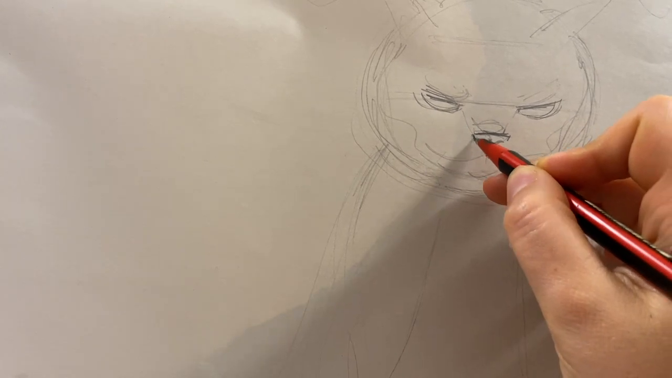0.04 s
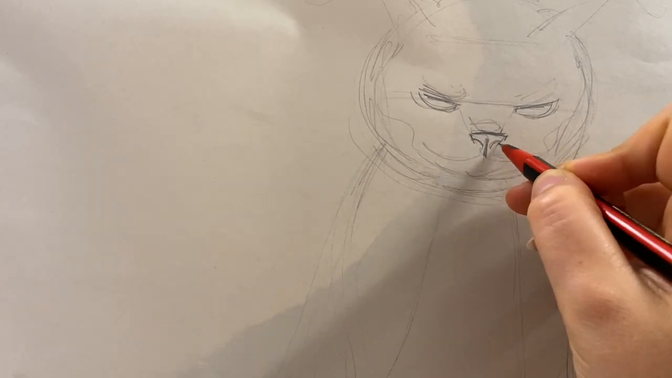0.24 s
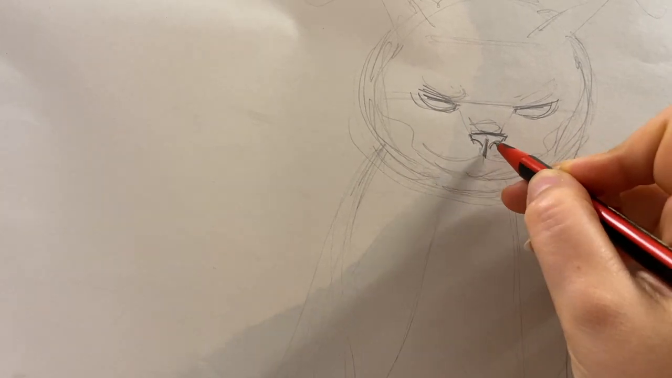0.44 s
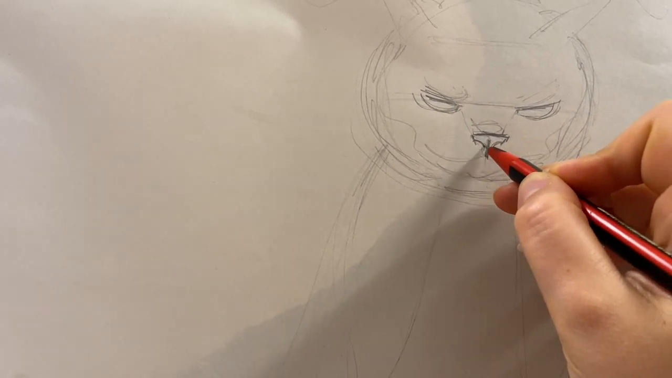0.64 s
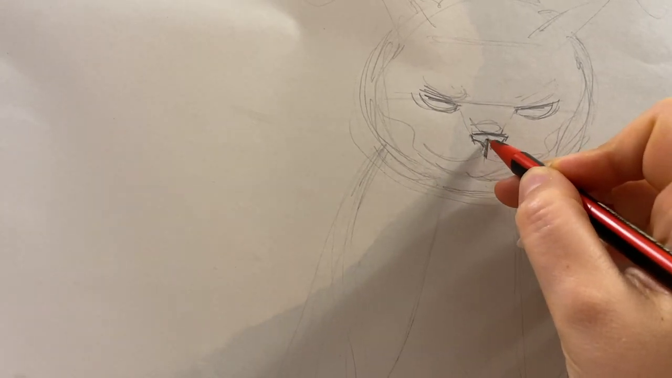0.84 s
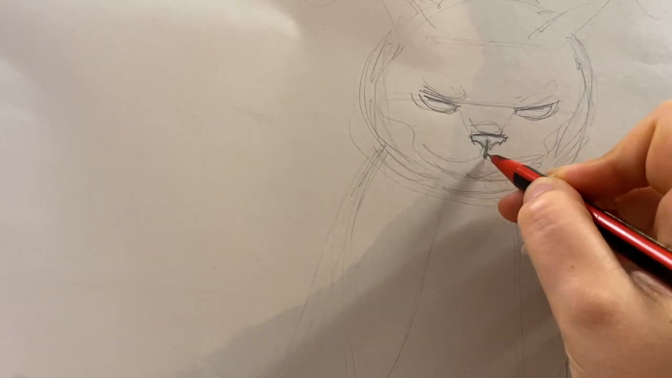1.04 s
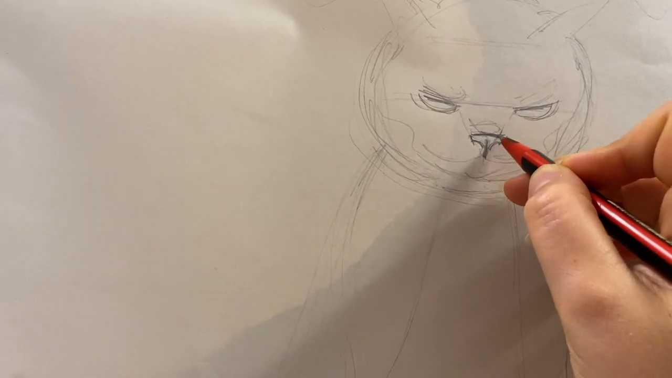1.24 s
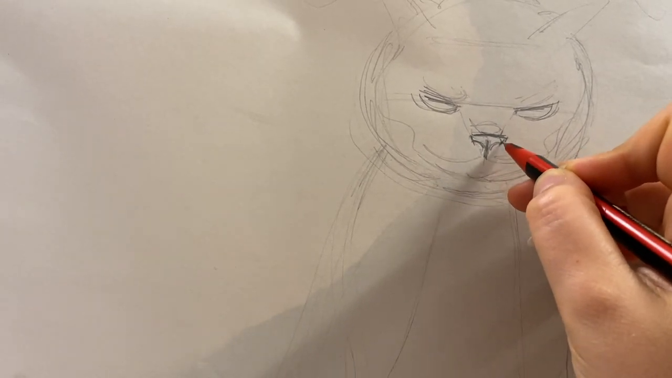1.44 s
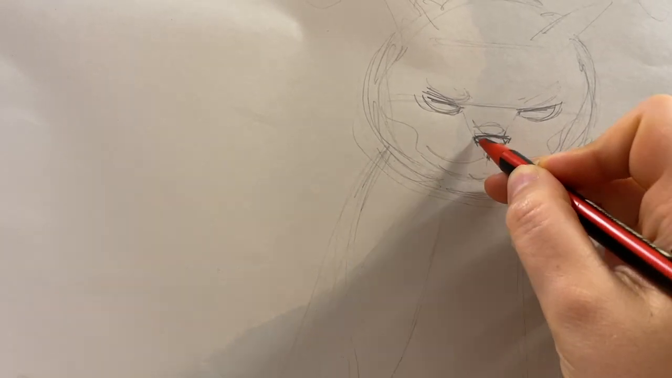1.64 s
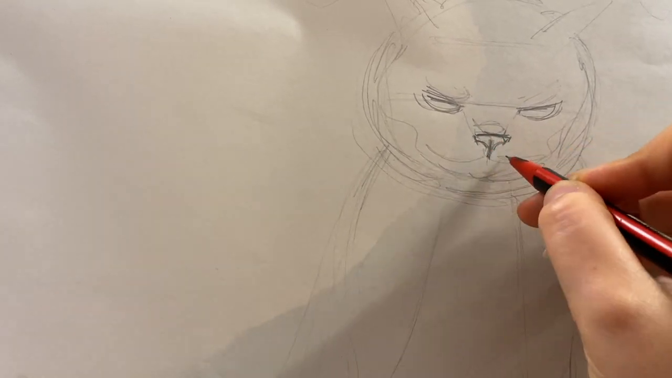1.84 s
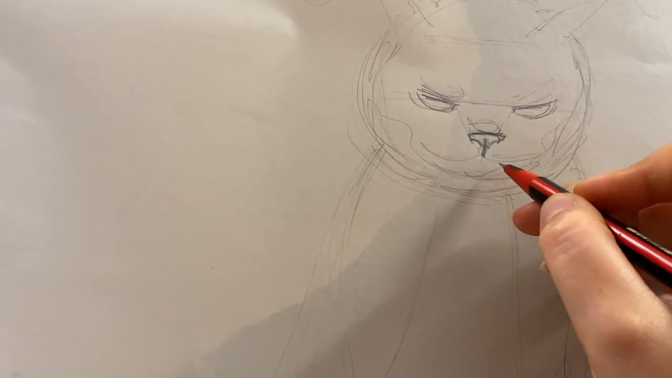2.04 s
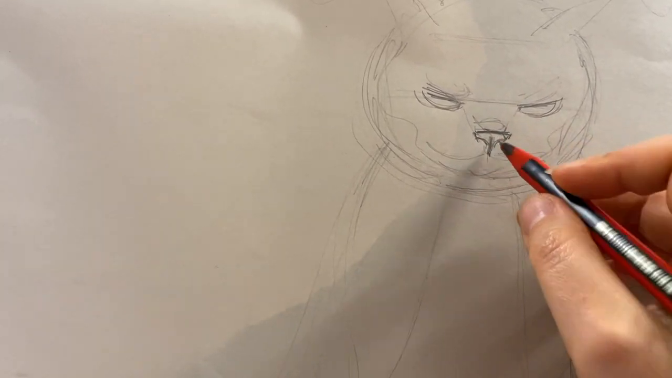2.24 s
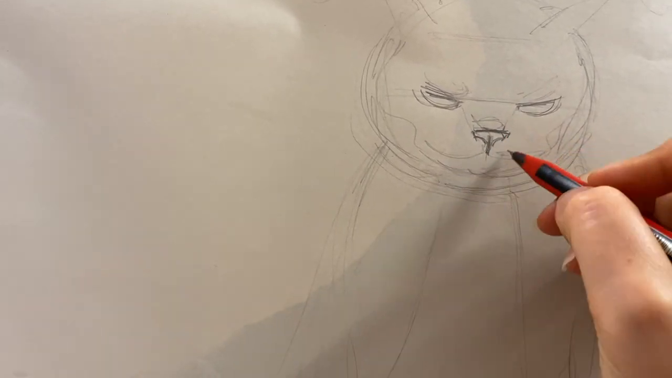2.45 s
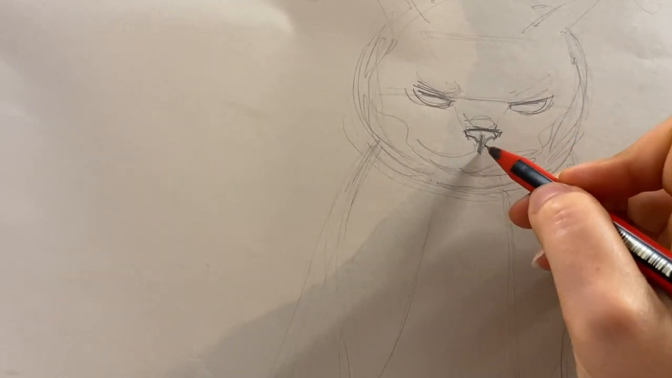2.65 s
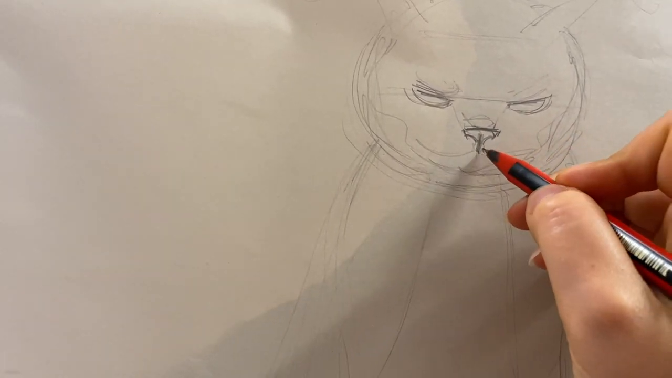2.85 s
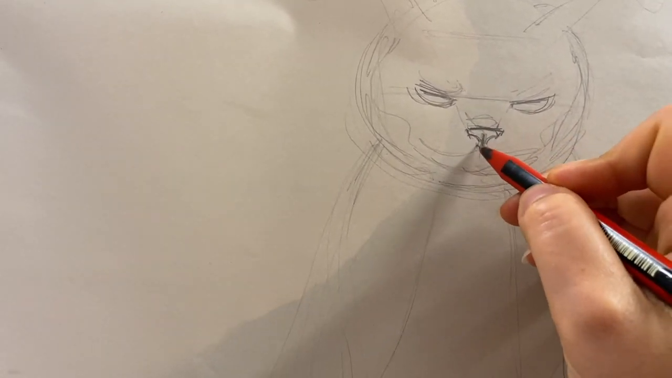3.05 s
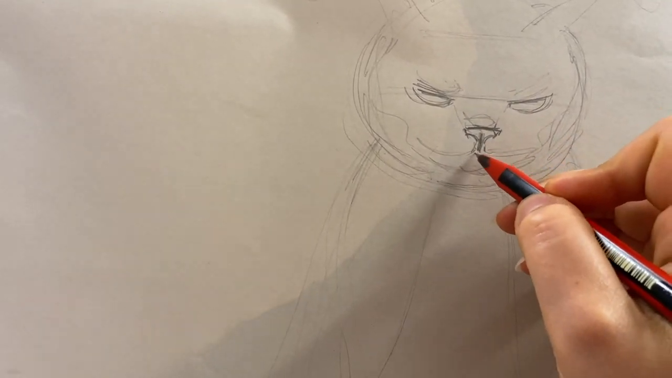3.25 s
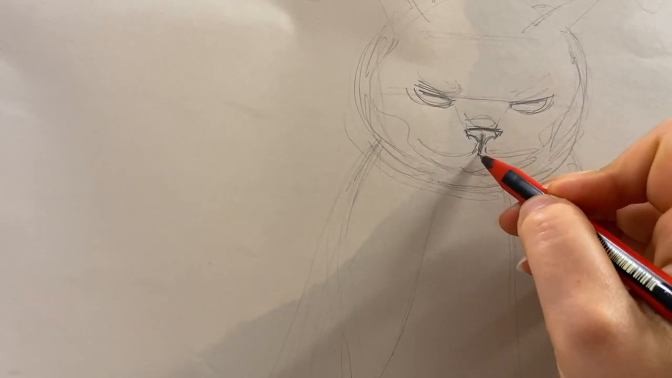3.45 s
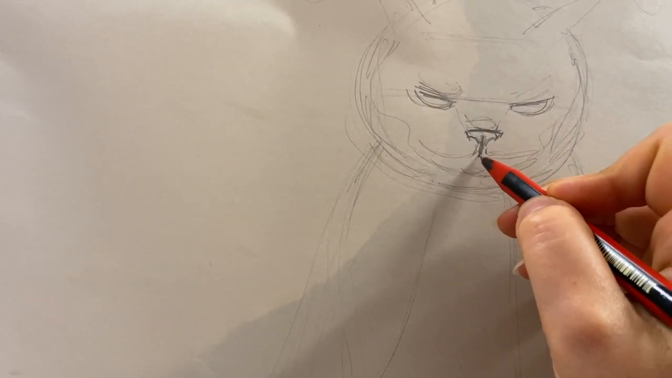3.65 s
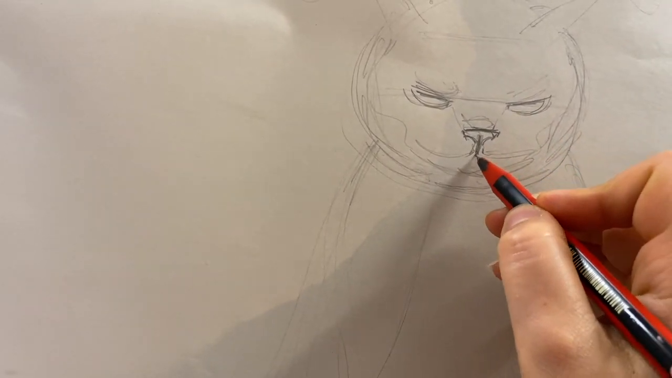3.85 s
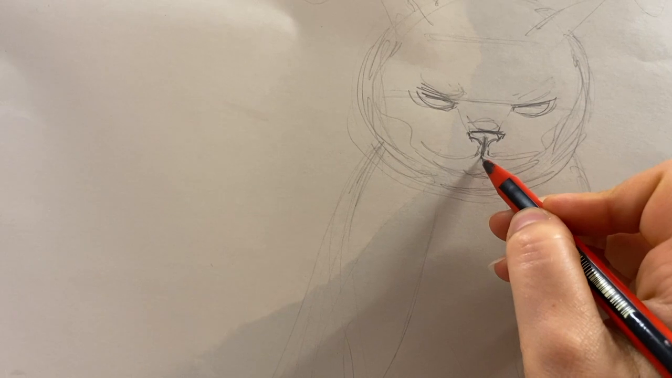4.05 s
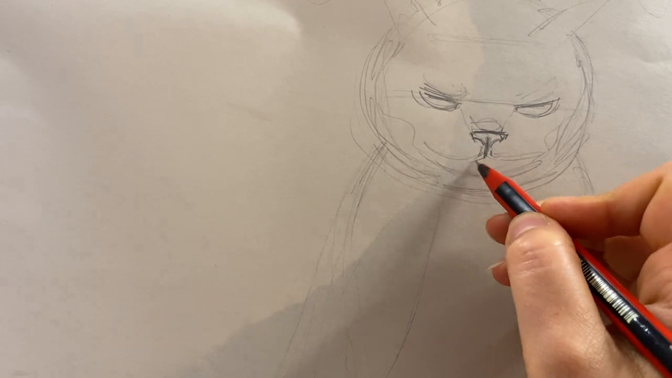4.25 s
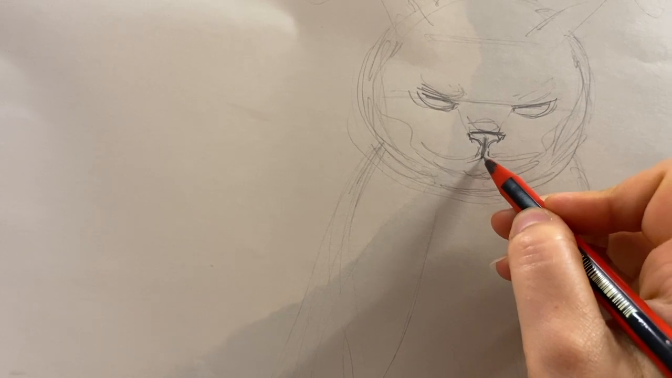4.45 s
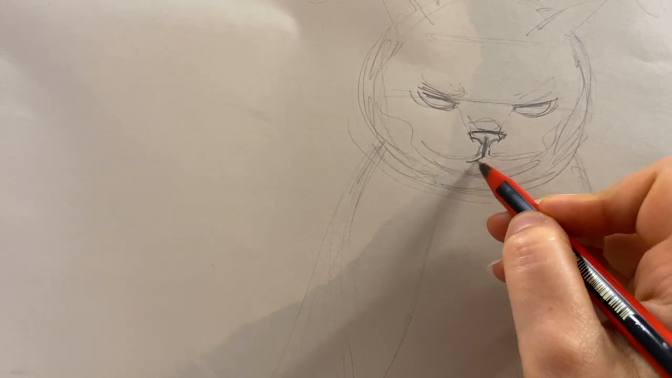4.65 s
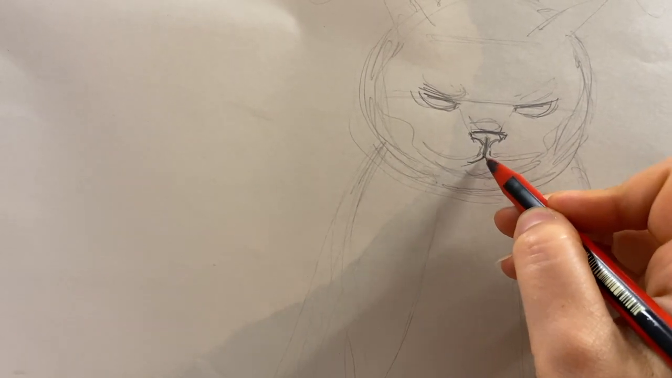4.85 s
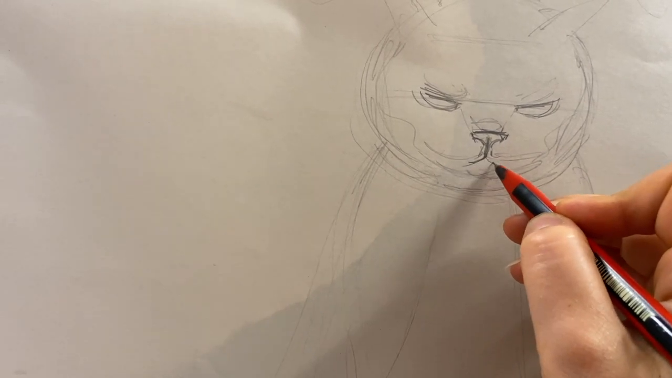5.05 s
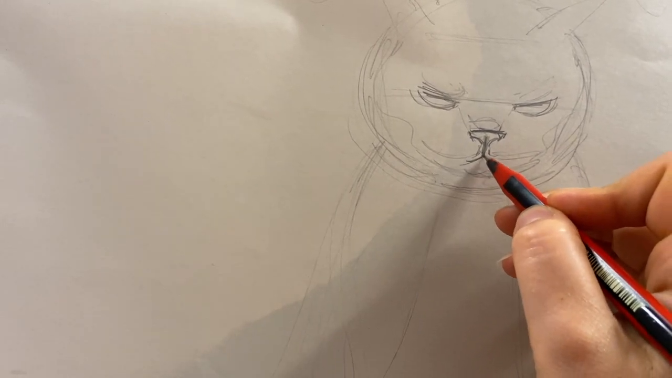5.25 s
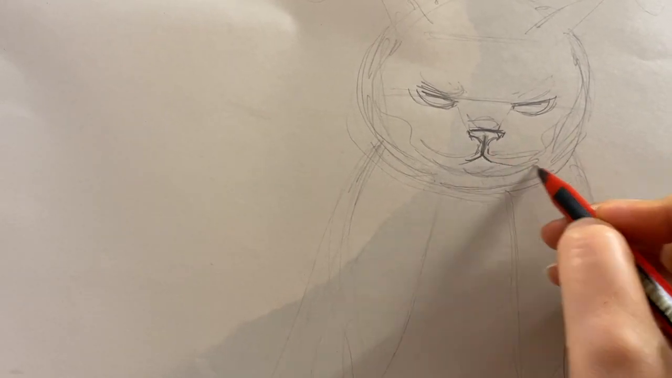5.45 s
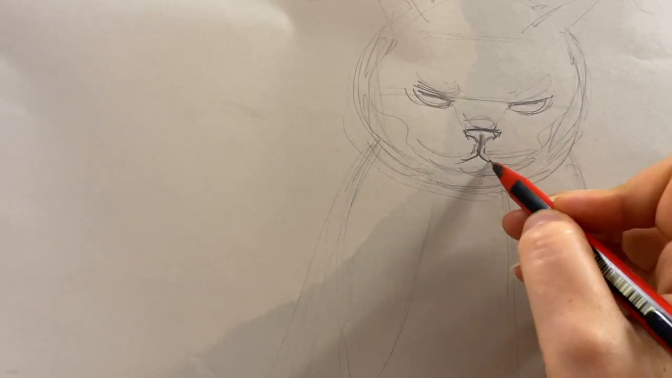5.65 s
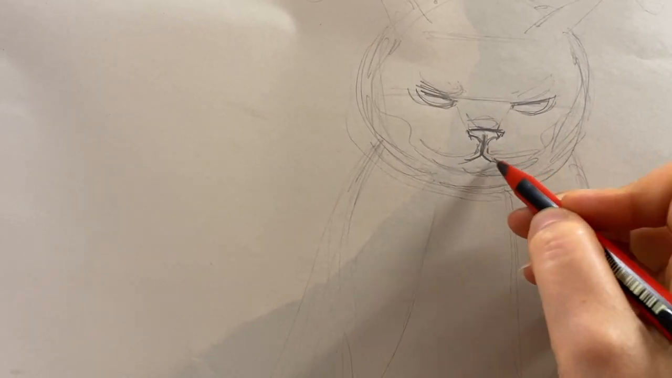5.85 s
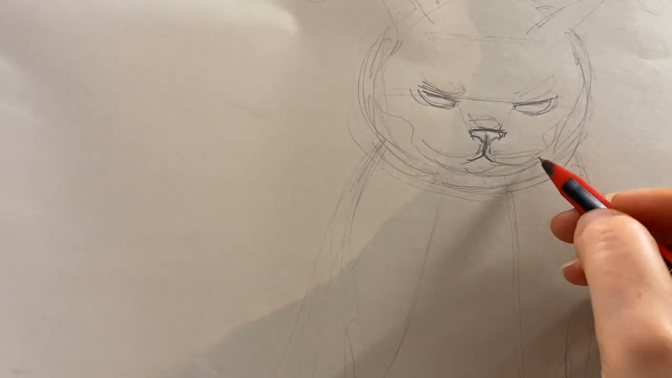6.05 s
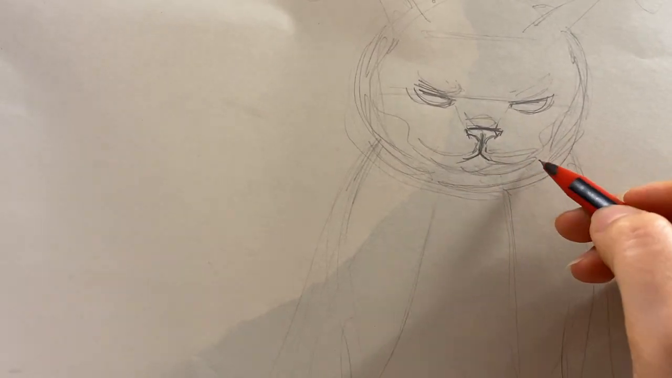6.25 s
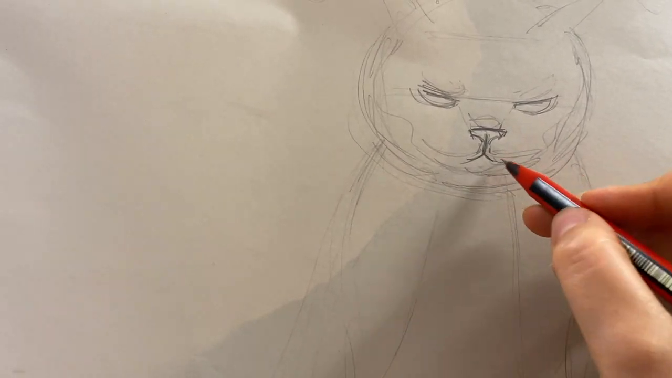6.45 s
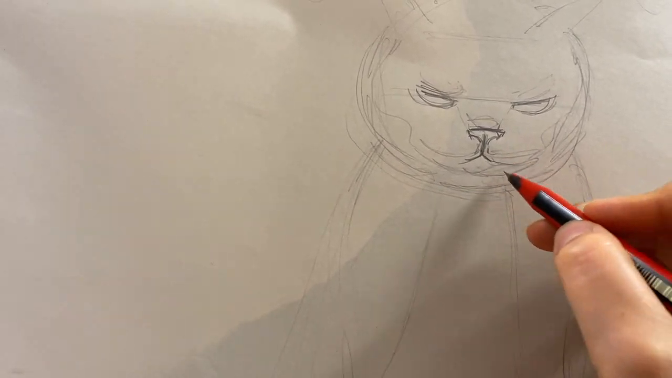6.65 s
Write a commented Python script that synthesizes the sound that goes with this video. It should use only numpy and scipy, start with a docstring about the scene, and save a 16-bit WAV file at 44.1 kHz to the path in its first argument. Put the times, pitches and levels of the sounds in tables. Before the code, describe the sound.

Close stereo pickup of a pencil sketching on paper in a small, quiet, dry room. Quick short scratches come in clusters, each a dry hiss and rasp with a low hollow thrum of the sheet. Soft taps mark the lead or hand landing. Activity thins after about a second and a half, pauses, then returns in tight bursts and firmer single strokes, ending with faint skin brushes.

```python
"""Pencil sketching on paper

Short pencil strokes heard close by in a quiet room. The lead hisses over the fibres and rasps on
the paper's tooth as uneven noise rung through resonances, and sets the sheet thrumming.
Soft blows land as falling chirps, and skin brushes and scuffs in swells of fine friction.
Beneath lie a low room tone of shaped noise, a faint diffuse tail and one brief steady tone."""
import sys
import numpy as np
from scipy import signal
from scipy.fft import rfft, irfft
from scipy.io import wavfile
from scipy.ndimage import uniform_filter1d

SR = 44100
rng = np.random.default_rng(int(sys.argv[2]) if len(sys.argv) > 2 else 0)


def transcribe(u):
    """Save the signal u as a 16-bit wav file named by the first command-line argument.

    u: samples, shape (n,) or (channels, n), limited to [-1, 1]; the rate is SR.
    q: integer samples, one column per channel.
    """
    v = np.clip(np.atleast_2d(u).T, -1, 1)
    q = np.round(v * 32767).astype(np.int16)
    wavfile.write(sys.argv[1], SR, q)


N = 295911
BLOCK = 10240  # samples in one short sound
HZ = np.fft.rfftfreq(BLOCK, 1 / SR)
TIME = np.arange(BLOCK) / SR

# Colour of the room tone. Each row: frequency in Hz, relative density in dB per Hz.
ROOM_TONE_COLOUR = [(15, -74), (25, -35.5), (107, 3), (144, -1), (178, -5), (260, -9.5), (331, -11.5),
                    (389, -13.5), (421, -15), (552, -16.5), (614, -18), (741, -19.5), (919, -21.5),
                    (2850, -31.5), (15500, -40)]
# Likeness of left and right in the room tone. Each row: frequency in Hz, likeness from 0 to 1.
ROOM_LIKENESS = [(60, 0.95), (180, 0.93), (550, 0.57), (1650, 0.05), (4970, 0.18), (15000, 0.6)]
# Reverberation of the room. Each row: frequency in Hz, time to die by 60 dB in seconds.
ROOM_DECAY = [(150, 0.13), (600, 0.05), (3000, 0.17), (14000, 0.092)]
# The brief tone. One row: start in seconds, end in seconds.
HUM_START_END = (4.29, 4.40)

# The hand slides on the page. Each row: start in seconds, length in seconds, level in dB at its fullest.
HAND_BRUSHES = [(0.739, 0.075, -72), (2.188, 0.17, -78), (5.924, 0.1, -77), (6.10, 0.12, -77),
                (6.402, 0.1, -69.5), (6.508, 0.086, -70.5)]
# Colour of skin on paper. Each row: frequency in Hz, relative density in dB per Hz.
SKIN_COLOUR = [(1500, -9), (3000, -15), (4500, 0), (6000, 2), (8200, 6), (8700, 5), (9600, 13.5),
               (10600, 0), (13000, -7), (16000, -6)]
# Fingers scuff on pencil and page. Each row: start in seconds, length in seconds, level in dB at its fullest.
FINGER_SCUFFS = [(1.52, 0.15, -69), (3.556, 0.021, -58.5), (3.78, 0.023, -67), (3.945, 0.022, -63.5),
                 (4.405, 0.036, -72)]
# Colour of the scuffs. Each row: frequency in Hz, relative density in dB per Hz.
FINGER_COLOUR = [(300, -6), (700, 2), (1500, 3.5), (2500, 0), (3300, -5), (4000, -7), (4800, -10),
                 (7000, -23), (15000, -20)]
# Likeness of left and right in every friction sound. Each row: frequency in Hz, likeness from 0 to 1.
RUB_LIKENESS = [(200, 0.96), (900, 0.88), (2000, 0.71), (3500, 0.51), (5000, 0.65), (8500, 1),
                (12000, 0.39), (13500, 1), (15500, 0.99)]

# Pencil or hand lands on the sheet. Each row: time in seconds, level in dB,
# hardness as the frequency in Hz where the contact has lost about 4 dB.
LANDINGS = [(0.273, -31.5, 252), (0.514, -35.5, 596), (0.576, -42.5, 400), (1.054, -30.5, 800),
            (1.157, -36.5, 600), (1.172, -34, 200), (1.249, -56, 1100), (1.449, -29, 294),
            (1.866, -43.5, 910), (2.605, -35, 630), (2.971, -40, 400), (3.096, -33, 450), (3.407, -38, 597),
            (3.559, -44, 1500), (3.751, -34.5, 390), (4.453, -40.5, 400), (5.568, -27.5, 760),
            (5.827, -31, 440), (6.093, -47, 1100), (6.096, -43.5, 99), (6.483, -38.5, 128),
            (6.513, -47, 260)]
# Colour of a landing before the contact softens it. Each row: frequency in Hz, relative density in dB per Hz.
LANDING_COLOUR = [(50, -31), (100, 3.5), (165, 18), (230, 5), (300, 9), (600, 2.5), (1000, -8.5),
                  (2500, -23), (15000, 26)]

# Low modes of the sheet. Each row: frequency in Hz, width in Hz, relative level in dB.
LOW_MODES = [(123, 74, -18.5), (175.4, 15.2, 0.5), (280.3, 26.7, 0), (297.4, 41, -9), (346, 85, -12.5),
             (381, 140, -12)]
# Higher modes of the sheet. Each row: frequency in Hz, width in Hz, relative level in dB.
HIGH_MODES = [(402, 116, -9.5), (487, 34, 3), (597, 42, 5), (646, 42, 3), (720, 81, -8), (813, 11, -4.5),
              (874, 68, 2), (1017, 76, -4), (1215, 57, -12), (1366, 49, -11.5), (1510, 75, -14),
              (1648, 58, -10.5), (1780, 31, -19.5), (1940, 143, -18), (2278, 76, -18), (2410, 43, -18.5)]
# Treble resonances of pencil and page. Each row: frequency in Hz, width in Hz, relative level in dB,
# left minus right in dB.
PENCIL_MODES = [(3120, 320, 4.5, 4), (4110, 420, 5, 5.5), (4350, 160, -10, 25), (4660, 177, 10.5, 4),
                (5600, 340, -9, 5), (6400, 370, 1, 4.5), (7510, 390, 1, 1.5), (8390, 190, 0.5, 0),
                (9040, 140, 0.5, -8), (10800, 290, -7.5, -17), (10540, 810, 2.5, 14.5),
                (12440, 430, 4.5, 7.5), (12050, 240, -8, -14), (13150, 500, -8, -20), (15000, 940, -8, 17)]
# Extra modes that ring only until the fingers shift their grip; columns as in the three tables above.
LOW_MODES_FREE = [(142.4, 14.4, -2.5), (173, 13, 3), (380, 33, -9)]
HIGH_MODES_FREE = [(1035, 120, -6), (1700, 300, -14.5), (2120, 190, -15.5)]
PENCIL_MODES_FREE = [(5440, 420, 5, 2.7), (7860, 350, 3.5, 2), (12800, 450, -7, 1)]
REGRIP_S = 2.1

# Pencil strokes. Each row: start in seconds, length in seconds, fibre hiss in dB and rasp on the tooth in dB
# (both at full speed), tilt of the sheet's thrum in dB per octave.
PENCIL_STROKES = [(-0.015, 0.026, -59, -52.5, 0.0), (0.014, 0.032, -61.0, -67, 6),
                  (0.069, 0.057, -65.5, -75, -2), (0.162, 0.03, -52.5, -47, 3),
                  (0.209, 0.025, -52.5, -48.5, -3.0), (0.249, 0.024, -56.5, -47, 11),
                  (0.289, 0.026, -59.0, -57.5, 1), (0.327, 0.027, -56.5, -60, 3),
                  (0.466, 0.037, -66.0, -67.5, -6), (0.509, 0.038, -62, -55, -8),
                  (0.555, 0.058, -65, -58.5, -12), (0.613, 0.042, -68.5, -63, -16),
                  (0.673, 0.032, -54, -40, -3.5), (0.697, 0.035, -51.5, -40.0, -3.5),
                  (0.744, 0.053, -63.5, -61, 0), (0.831, 0.043, -57, -51, -0.5),
                  (0.892, 0.037, -54, -48, -4.5), (0.947, 0.04, -54.5, -45.5, 4.5),
                  (0.997, 0.032, -53, -47.5, -2), (1.045, 0.041, -55.5, -46.5, 25),
                  (1.202, 0.033, -59.5, -52, -6), (1.252, 0.037, -58, -45, -9.0),
                  (1.292, 0.028, -62.5, -50.5, -6.5), (1.341, 0.029, -60.5, -52, -18),
                  (1.421, 0.037, -55.5, -39, -13.5), (1.447, 0.048, -47.5, -35, 0.5),
                  (1.519, 0.026, -64, -75.5, 5.0), (1.564, 0.035, -64, -63.5, -11),
                  (1.616, 0.021, -67.5, -71, -1), (1.654, 0.058, -69, -69, 4), (1.699, 0.017, -63, -67, 6),
                  (2.461, 0.026, -64.5, -76, 1), (2.615, 0.038, -56.0, -43.5, 3),
                  (2.674, 0.029, -54.5, -40.5, 10), (2.718, 0.03, -55.5, -41.5, 7),
                  (2.764, 0.022, -54.0, -47.5, -5), (2.799, 0.047, -56.0, -44, -2),
                  (2.843, 0.016, -53.5, -53.5, 21), (2.946, 0.031, -66, -76, 2),
                  (2.996, 0.036, -52.5, -36.0, 16), (3.049, 0.022, -52, -40.5, -1),
                  (3.09, 0.038, -52.5, -39.5, 13), (3.232, 0.036, -64.0, -72, 6),
                  (3.289, 0.0218, -64.5, -60, 2), (3.365, 0.027, -64.5, -55.5, 5),
                  (3.408, 0.024, -55.5, -44, 2), (3.456, 0.021, -61.5, -47.5, -2),
                  (3.556, 0.023, -85, -55.5, -1), (4.078, 0.033, -48.5, -35.0, 9),
                  (4.457, 0.049, -57, -44, 4), (4.49, 0.045, -53, -48.5, -8),
                  (4.576, 0.067, -52, -41.5, -10.5), (4.675, 0.046, -54.5, -35.5, 4),
                  (4.702, 0.03, -47.5, -38.5, 5.5), (4.923, 0.049, -58, -47, -18),
                  (4.996, 0.048, -54.5, -47, -3), (5.074, 0.047, -57.5, -53, -9.5),
                  (5.135, 0.059, -58, -49.5, -13), (5.211, 0.033, -59, -53, -17),
                  (5.268, 0.043, -59.5, -52.0, -15.5), (5.345, 0.058, -48.0, -35.0, 8),
                  (5.57, 0.03, -65, -51.5, -10.0), (5.605, 0.05, -54.0, -43, -8.5),
                  (5.824, 0.038, -62.5, -61, 18), (5.859, 0.043, -49.0, -35.5, 1)]
# The lead lifts off in a fixed time in seconds plus a share of the stroke.
LIFT_S, LIFT_SHARE = .008, .34
# How steeply the speed rises and falls at the edges of a stroke (2 = bell curve).
RISE_STEEPNESS, FALL_STEEPNESS = 2.85, 2.21
# The hiss follows the speed itself, the rasp and the thrum these powers of it.
RASP_POWER, THRUM_POWER = 1.4, 0.94
# The thrum grows with the rasp until the lead pins the sheet down: dB over a light rasp, ceiling in dB.
THRUM_OVER_DB, THRUM_CEILING_DB = 15, -31
# A grazing lead hisses brightly and dulls as the rasp outgrows the hiss; a high thrum brightens it:
# tilt in dB per octave, tilt lost per dB of rasp over hiss, share of the thrum's tilt added.
HISS_TILT_DB, HISS_DULLING, HISS_FOLLOWS = 2.5, 0.25, 0.095
# A deep thrum comes with a thinner rasp: tilt in dB per octave, share of the thrum's tilt taken off.
RASP_TILT_DB, RASP_THINNING = 1.0, .16
# The sheet springs back as the lead leaves it: dB against the thrum, tilt in dB per octave,
# delay in seconds, time in seconds that its energy is reckoned over.
REBOUND_DB, REBOUND_TILT_DB, REBOUND_DELAY_S, REBOUND_S = -10, -9, .002, 0.013


def amp(db):
    """Turns decibels into a gain."""
    return 10 ** (np.asarray(db) / 20)


def unit(x):
    """Scales a sound to energy 1 per channel."""
    energy = np.mean(np.sum(x ** 2, -1))
    return x / np.sqrt(energy + 1e-30)


def read(points, hz):
    """Joins points by straight lines on a log-frequency axis."""
    f, value = np.transpose(points)
    return np.interp(np.log(hz + 1), np.log(f), value)


def add(mix, s, sound):
    """Mixes a stereo sound in at time s, trimmed to the ends of the scene."""
    at = round(s * SR)
    sound = sound[:, max(-at, 0):]
    part = mix[:, max(at, 0):][:, :sound.shape[1]]
    part += sound[:, :part.shape[1]]


def panned(left_db):
    """Left and right gains for a level difference, which may vary with frequency."""
    return amp(np.array([[1], [-1]]) / 2 * left_db)


def pair(z, same, hz):
    """Makes two unrelated spectra partly alike."""
    c = np.clip(read(same, hz), 0, 1)
    right = c * z[0] + np.sqrt(1 - c ** 2) * z[1]
    return np.array([z[0], right])


def causal(gain):
    """The minimum-phase response with this gain: it rings only after the blow."""
    log_gain = np.log(np.maximum(gain / gain.max(), 1e-5))
    circle = np.concatenate([log_gain, log_gain[..., -2:0:-1]], -1)
    return np.exp(np.conj(signal.hilbert(circle)))[..., :len(HZ)]


def resonances(modes, skirt):
    """Gain of a set of resonances; skirt sets how deep the valleys between them are."""
    power = 0
    for hz, width, db in modes:
        detuning = (2 * (HZ - hz) / width) ** 2
        power = power + amp(db) ** 2 / (1 + detuning / skirt) ** skirt
    return np.sqrt(power)


def bending(lag):
    """Bending waves in paper travel slower the lower they are; lag is the delay in seconds at 100 Hz."""
    return np.exp(-4j * np.pi * lag * np.sqrt(100 * HZ))


def friction(push, response, catches_per_s, spread_db, smooth):
    """Catches of uneven size over a smooth rub, scaled by the push and rung through a body."""
    size = amp(spread_db * np.minimum(rng.exponential(1, (2, BLOCK)), 3))
    caught = rng.random((2, BLOCK)) < catches_per_s / SR
    catches = rng.standard_normal((2, BLOCK)) * size * caught
    rub = unit(rng.standard_normal((2, BLOCK)))
    drive = (unit(catches) + smooth * rub) * push
    rung = irfft(pair(rfft(drive), RUB_LIKENESS, HZ) * response)
    return unit(rung) * np.linalg.norm(push)


def room_tone(level_db=-56.5, drift_db=.5):
    """Low murmur of the air in the room with a faint hiss on top, its level drifting a little."""
    hz = np.fft.rfftfreq(N, 1 / SR)
    z = pair(rfft(rng.standard_normal((2, N))), ROOM_LIKENESS, hz)
    left_db = read([(120, 0.27), (1000, 1.5), (8000, 2)], hz)  # left minus right
    tone = irfft(z * amp(read(ROOM_TONE_COLOUR, hz)) * panned(left_db), N)
    drift = irfft(rfft(rng.standard_normal(N)) / (1 + (hz / 5) ** 2), N)
    level = amp(level_db + drift_db * drift / np.std(drift))
    return level * tone / np.std(tone.mean(0))


def hum(hz=392, db=-59):
    """A faint, brief sine tone that swells and fades, equal on both sides."""
    start, end = HUM_START_END
    t = np.arange(N) / SR
    progress = np.clip((t - start) / (end - start), 0, 1)
    swell = np.sqrt(abs(np.sin(np.pi * progress)))
    return amp(db) * swell * np.sin(2 * np.pi * hz * t)


def room(x, gap=0.016):
    """A diffuse tail of noise that begins after a gap in seconds, each band dying at its own speed."""
    noise = rng.standard_normal((2, BLOCK)) * (TIME > gap)
    hz, t, z = signal.stft(noise, SR, nperseg=256)
    decay = amp(-60 * t / read(ROOM_DECAY, hz)[:, None])
    tail = signal.istft(z * decay, SR, nperseg=256)[1]
    return signal.fftconvolve(x, unit(tail), axes=1)[:, :N]


def brushes(rows, colour, left_db):
    """Skin slides with a soft swell of fine friction."""
    out = np.zeros((2, N))
    body = causal(amp(read(colour, HZ)))
    for s, length, db in rows:
        arch = np.sin(np.pi * np.minimum(TIME / length, 1))
        slide = np.maximum(arch, 0) ** 0.55
        rub = friction(slide, body, catches_per_s=4000, spread_db=3, smooth=1)
        add(out, s, amp(db) * rub * panned(left_db))
    return out


def taps(ring=0.32, length=0.0054):
    """A soft blow spreads through the sheet as a falling chirp and leaves the low modes ringing."""
    out = np.zeros((2, N))
    for s, db, hard_hz in LANDINGS:
        contact = 1 / (1 + (HZ / hard_hz / 2) ** 2) ** 2  # a soft contact passes less treble
        blow = causal(amp(read(LANDING_COLOUR, HZ)) * contact)
        chirp = irfft(blow * bending(lag=0.01131))
        modes = irfft(causal(resonances(LOW_MODES, skirt=0.67) * contact) * bending(lag=0.00794))
        sound = unit(unit(chirp) + ring * unit(modes))
        # the level is reckoned over length, in seconds
        add(out, s, amp(db) * np.sqrt(length * SR) * sound * panned(left_db=3.0))
    return out


def ringing_modes(s):
    """Modes of the pencil and of the sheet (high, low) that the grip leaves free at time s."""
    if s < REGRIP_S:
        return PENCIL_MODES + PENCIL_MODES_FREE, HIGH_MODES + HIGH_MODES_FREE, LOW_MODES + LOW_MODES_FREE
    return PENCIL_MODES, HIGH_MODES, LOW_MODES


def driven(modes, tilt_db, top_hz, vary_db=1.4):
    """Drives the modes a little differently each time; tilt_db per octave favours higher ones, up to top_hz."""
    changed = []
    for hz, width, db, *rest in modes:
        tilt = tilt_db * np.log2(min(hz, top_hz))
        changed.append((hz, width, db + tilt + vary_db * rng.standard_normal(), *rest))
    return changed


def comb(size=0.46, count=3):
    """A few random short delays per channel give each stroke's hiss a fine, uneven comb colour."""
    delay = rng.uniform(.0004, .004, (count, 2, 1))  # seconds
    return 1 + size * np.exp(-2j * np.pi * HZ * delay).sum(0)


def pencil_body(modes):
    """The treble resonances around the lead, each leaning to its own side, with a comb colour."""
    sides = []
    for side in (1, -1):  # left, right
        heard = [(hz, width, db + side * left_db / 2) for hz, width, db, left_db in modes]
        sides.append(resonances(heard, skirt=1.0))
    return causal(np.array(sides)) * comb()


def sheet_body(modes, cut_hz=105):
    """The slow modes of the sheet, which radiates ever less below cut_hz."""
    gain = resonances(modes, skirt=1.334) / np.sqrt(1 + (cut_hz / (HZ + 1)) ** 4)
    left_db = read([(170, 0.24), (300, 4.6)], HZ)  # left minus right
    return causal(gain) * panned(left_db)


def stroke_bodies(pencil_modes, high_modes, low_modes, bite_db, thrum_tilt):
    """Responses of the pencil and of the sheet's high and low modes; bite_db is the rasp over the hiss."""
    hiss_tilt = HISS_TILT_DB - HISS_DULLING * bite_db + HISS_FOLLOWS * thrum_tilt
    rasp_tilt = RASP_TILT_DB - RASP_THINNING * thrum_tilt
    pencil = pencil_body(driven(pencil_modes, hiss_tilt, top_hz=12000))
    high = causal(resonances(driven(high_modes, rasp_tilt, top_hz=1710), skirt=1.31))
    low = sheet_body(driven(low_modes, thrum_tilt, top_hz=318))
    return pencil, high * bending(lag=0.003487) * panned(left_db=2.0), low


def stroke_speed(t, length):
    """The hand speeds up around t = 0, then slows as the lead lifts off; 1 at the fastest."""
    fall = min(LIFT_S + LIFT_SHARE * length, .8 * length)
    rise = length - fall
    speeding_up = abs(t / rise - 1) ** RISE_STEEPNESS
    slowing_down = abs((t - rise) / fall) ** FALL_STEEPNESS
    return np.exp(-np.where(t < rise, speeding_up, slowing_down))


def rebound(modes):
    """One soft push on the sheet's lowest modes as it springs back."""
    ring = irfft(sheet_body(driven(modes, REBOUND_TILT_DB, top_hz=400)))
    return amp(REBOUND_DB) * np.sqrt(REBOUND_S * SR) * unit(ring)


def strokes(tooth_db=1.2):
    """In each stroke the lead hisses over the fibres, rasps on the tooth and sets the sheet thrumming."""
    lead = .05  # seconds of room ahead of the start for the speed to rise
    out = np.zeros((2, N))
    for start, length, hiss_db, rasp_db, thrum_tilt in PENCIL_STROKES:
        pencil_modes, high_modes, low_modes = ringing_modes(start)
        pencil, high, low = stroke_bodies(pencil_modes, high_modes, low_modes, rasp_db - hiss_db, thrum_tilt)
        speed = stroke_speed(TIME - lead, length)
        # the tooth of the paper makes the drag uneven from one millisecond to the next
        tooth = uniform_filter1d(rng.standard_normal(BLOCK), size=90)
        drag = speed * amp(tooth_db * tooth / np.std(tooth))
        hiss = friction(drag, pencil, catches_per_s=3500, spread_db=2.5, smooth=0.92)
        rasp = friction(drag ** RASP_POWER, high, catches_per_s=800, spread_db=3.0, smooth=0.64)
        thrum = friction(speed ** THRUM_POWER, low, catches_per_s=580, spread_db=2.0, smooth=0.51)
        thrum_gain = 1 / (1 / amp(rasp_db + THRUM_OVER_DB) + 1 / amp(THRUM_CEILING_DB))
        add(out, start - lead, amp(hiss_db) * hiss + amp(rasp_db) * rasp + thrum_gain * thrum)
        add(out, start + length + REBOUND_DELAY_S, thrum_gain * rebound(low_modes))
    return out


def scene():
    """Pencil and hand on the page, in the room."""
    hand = brushes(HAND_BRUSHES, SKIN_COLOUR, left_db=9)
    fingers = brushes(FINGER_SCUFFS, FINGER_COLOUR, left_db=4)
    near = strokes() + taps() + hand + fingers
    return near + amp(-19) * room(near) + room_tone() + hum()


def record(dry, low_cut_hz=44, edge_hz=15760):
    """The microphone's bass roll-off, then the recorder's band limit."""
    roll_off = signal.butter(2, low_cut_hz, "highpass", fs=SR, output="sos")
    thin = signal.sosfilt(roll_off, dry)
    band_limit = signal.firwin(1023, edge_hz, window=("kaiser", 9), fs=SR)
    return signal.oaconvolve(thin, band_limit[None], "same")


dry = scene()
out = record(dry)
transcribe(out)
```